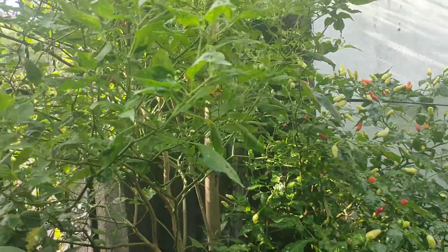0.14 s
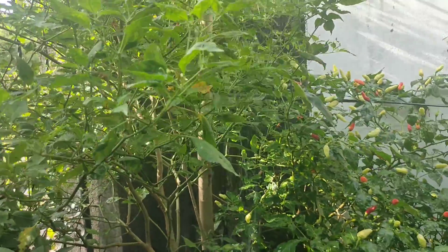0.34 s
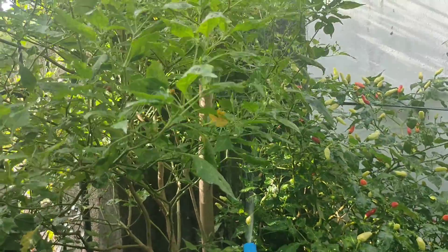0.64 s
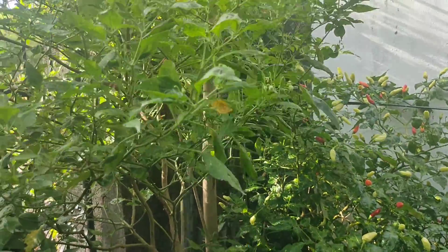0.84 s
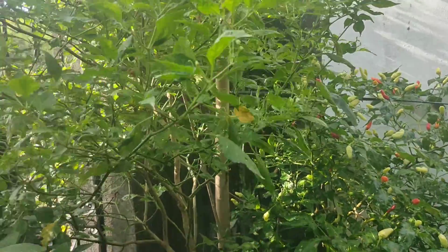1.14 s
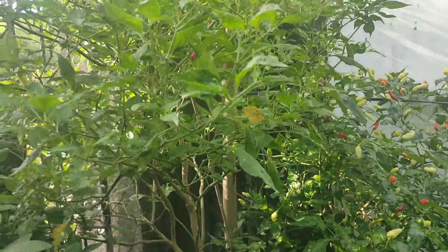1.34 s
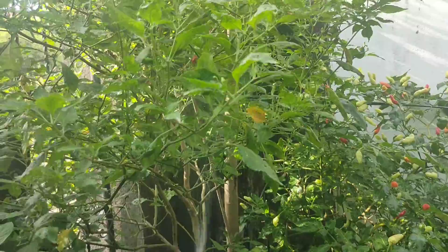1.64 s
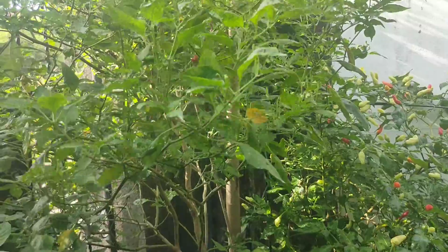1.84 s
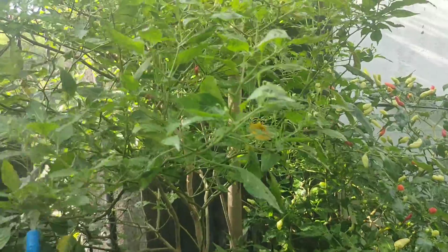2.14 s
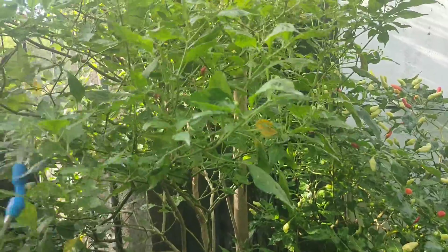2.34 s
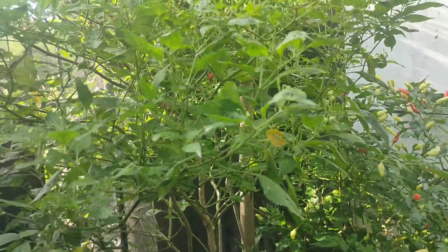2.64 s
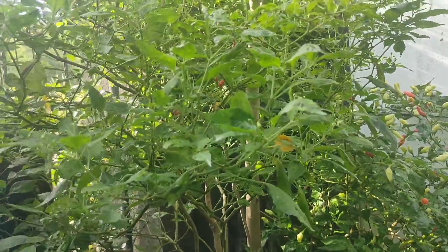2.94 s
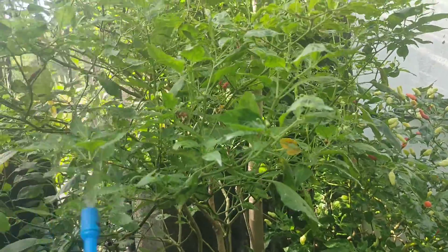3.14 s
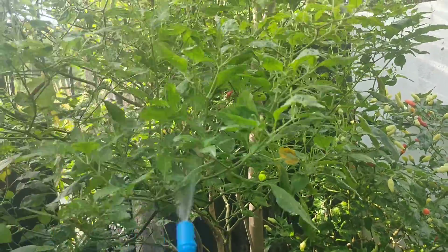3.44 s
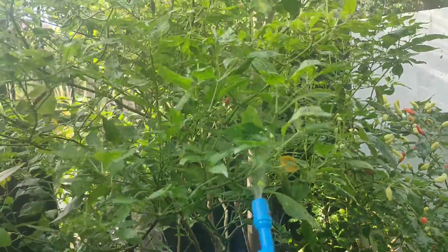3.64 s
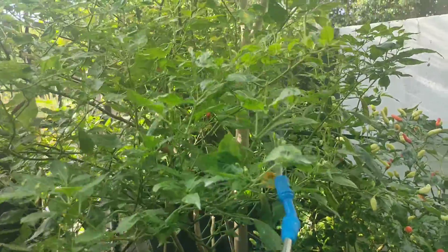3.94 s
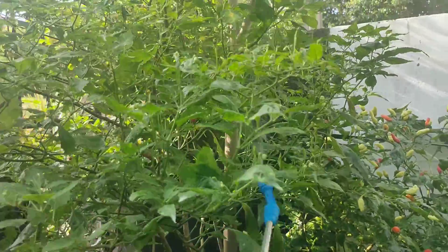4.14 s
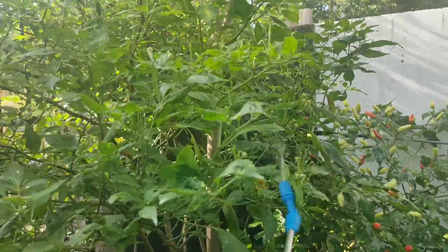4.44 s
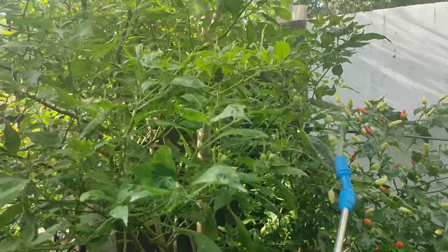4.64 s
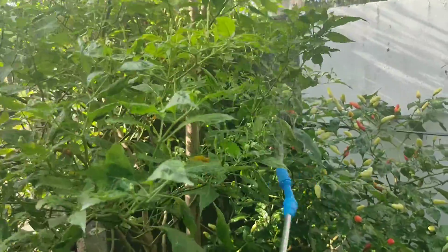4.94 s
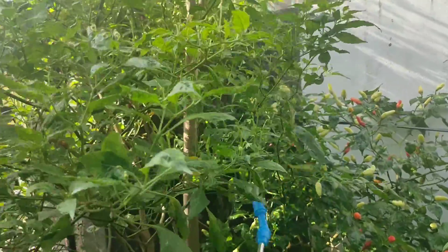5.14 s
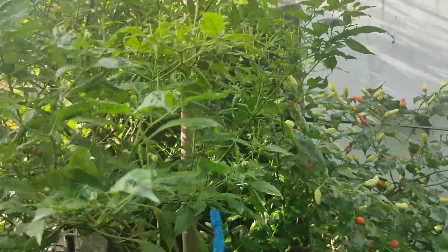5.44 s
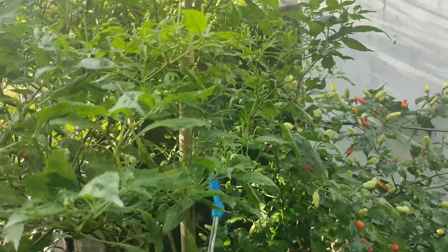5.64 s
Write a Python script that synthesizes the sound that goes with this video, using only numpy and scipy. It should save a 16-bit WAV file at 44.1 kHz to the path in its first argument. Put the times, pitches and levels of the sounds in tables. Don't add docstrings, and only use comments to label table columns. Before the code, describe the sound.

Close, bright spray hiss fizzes and patters unevenly across foliage while the wand and hose rub, ring faintly and bump stems.

```python
import sys
import numpy as np
from scipy import signal
from scipy.fft import rfft, irfft
from scipy.io import wavfile
from scipy.ndimage import uniform_filter1d

SR = 44100
rng = np.random.default_rng(int(sys.argv[2]) if len(sys.argv) > 2 else 0)


def voltage_ratio(decibels):
    exponent = np.asarray(decibels, float) / 20
    return 10 ** exponent


def wav_out(sig):
    wavfile.write(sys.argv[1], SR, np.round(np.clip(np.atleast_2d(sig).T, -1, 1) * 32767).astype(np.int16))


N = 255339
TIME_S = np.arange(N) / SR
FRAME, HOP = 512, 128
HZ = np.fft.rfftfreq(FRAME, 1 / SR)
FRAME_S = np.arange(N // HOP + 5) * HOP / SR


# time_s, fizz_db, broad_leaves_db, left_over_right_db
SWEEP = [(0.0, -39, 4, 4), (0.3, -42.5, 4.5, 2), (0.7, -43.5, 3, 2.5), (1.0, -42, 2.5, 0.5),
         (1.3, -42.5, 0.5, 1.5), (1.68, -45, 2, 2), (1.9, -41, 2.5, 1.5), (2.1, -46, -2.5, 0.5),
         (2.5, -43.5, -3, 0.5), (2.8, -45, -5, 1), (3.1, -43.5, 3, 0.5), (3.45, -41.5, 4, 1.5),
         (3.9, -43, 2.5, 2.5), (4.25, -43.5, -0.5, 2), (4.55, -44, 2, 3), (5.0, -45, 6, 2),
         (5.38, -45, 1, 2), (5.79, -44, 3.5, 0.5)]
# pitch_hz, density_db
JET_SPECTRUM = [(3000, -26.5), (7000, -9), (11000, 1.5), (16000, -2.5)]
# pitch_hz, density_db
FIZZ_SPECTRUM = [(2500, -21.5), (4000, -3), (6000, 2), (8400, 6.5), (9600, 4), (12000, -4), (16000, -15)]
# pitch_hz, density_db
PATTER_SPECTRUM = [(900, -29), (1400, -21), (1800, 3.5), (2400, 1.5), (3200, 1), (4300, -3.5), (5500, -12),
                   (9000, -22.5), (16000, -10.5)]


def spray():
    base_db, broad_db, pan_db = follow(SWEEP)
    fizz_up_db, patter_up_db = swells()
    fizz_db = base_db + fizz_up_db
    slow_db = uniform_filter1d(fizz_db, size=SR // 3)
    jet = voltage_ratio(slow_db - 7.0) * cloud(JET_SPECTRUM, patchy_db=2.0, flicker_db=1.0)
    fizz = voltage_ratio(fizz_db - 3.0) * cloud(FIZZ_SPECTRUM, patchy_db=1.5, flicker_db=0.85)

    mist = cloud(PATTER_SPECTRUM, patchy_db=1.5, flicker_db=1.0)
    taps = drops(per_s=900, spread_db=3.5, low_hz=1580, high_hz=10400, cycles=2.4)
    patter_db = base_db - 2.5 + 0.12 * broad_db + patter_up_db
    patter = voltage_ratio(patter_db) * (mist + voltage_ratio(-10.0) * taps)

    wobble_db = 2.18 * wander(2000)
    drum_db = base_db - 10.5 + broad_db + 0.94 * patter_up_db + wobble_db
    drum = voltage_ratio(drum_db) * band(pair(0.06), 1060.0, 1807.0)

    sputter = voltage_ratio(0.29 * wobble_db)
    sputter = sputter * voltage_ratio(1.31 * wander(40))
    pan = voltage_ratio(np.array([[.5], [-.5]]) * (pan_db - 3.0))
    return drum + sputter * (jet + (fizz + patter) * pan)


# middle_s, length_s, fizz_swell_db, patter_swell_db
LEAVES = [(0.07, 0.18, 3, 0), (0.177, 0.11, 4, -5), (0.372, 0.069, 4, -2.5), (0.464, 0.13, 7.5, 4.5),
          (0.539, 0.093, 6, 6.5), (0.77, 0.091, 4, 2), (0.97, 0.051, 2, -0.5), (1.127, 0.049, 1.5, 3.5),
          (1.456, 0.44, 4, 4), (1.776, 0.21, 4, 4), (1.977, 0.037, 7.5, 4.5), (2.208, 0.25, 7, 5.5),
          (2.42, 0.19, 4, 2.5), (2.503, 0.16, 1, -1.5), (2.69, 0.2, 1, 1.5), (3.035, 0.31, 4, 3.5),
          (3.235, 0.32, 4.5, 1.5), (3.56, 0.19, 1, 0), (3.825, 0.15, 4, 4), (3.9, 0.078, 4.5, 2.5),
          (4.104, 0.12, 3.5, -1), (4.46, 0.54, 4.5, 3), (4.701, 0.14, 6.5, 4), (4.867, 0.091, 7, 4.5),
          (4.933, 0.12, 4, 9), (5.169, 0.025, 4.5, 0), (5.534, 0.15, 5.5, 4.5), (5.618, 0.045, 4, -0.5),
          (5.7, 0.1, 7.5, 6), (5.79, 0.12, 5.5, 1)]


def swells():
    middle_s, length_s, *columns_db = np.transpose(LEAVES)[:, :, None]
    hump = np.cos(np.pi * np.clip((FRAME_S - middle_s) / length_s, -.5, .5)) ** 2
    return [np.interp(TIME_S, FRAME_S, (db * hump).sum(0)) for db in columns_db]


# pitch_hz, likeness
LIKENESS = [(60, 0.79), (160, 1), (300, 1), (600, 0.18), (1200, 0.83), (3000, 0.41), (6000, 0.32),
            (15000, 0.058)]
# time_s, left_lag_samples
LAG = [(0, 1.1), (.6, 1), (1.0, 11.5), (1.45, 2), (1.75, 11), (2.4, 11.5), (2.9, 11.5), (3.4, 1.5),
       (4.1, 1.5), (4.5, -4.5), (5.0, 2.5), (5.79, 2.5)]


def cloud(spectrum, patchy_db, flicker_db):
    a, b, c, d, patches = rng.standard_normal((len(FRAME_S), len(HZ), 5)).T
    patches = uniform_filter1d(patches, size=7, axis=0)
    patches = evened(uniform_filter1d(patches, size=20, axis=1))
    flicker = evened(uniform_filter1d(rng.standard_normal(len(FRAME_S)), size=5))
    same = np.clip(read(LIKENESS, HZ), -1, 1)[:, None]
    lag_s = np.interp(FRAME_S, *np.transpose(LAG)) / SR
    late = np.exp(-2j * np.pi * HZ[:, None] * lag_s)
    right = a + 1j * b
    left = same * late * right + np.sqrt(1 - same ** 2) * (c + 1j * d)
    level_db = read(spectrum, HZ)[:, None] + patchy_db * patches + flicker_db * flicker
    z = np.array([left, right]) * voltage_ratio(level_db)
    return evened(signal.istft(z, nperseg=FRAME, noverlap=FRAME - HOP)[1][:, :N])


def drops(per_s, spread_db, low_hz, high_hz, cycles):
    size = voltage_ratio(spread_db * np.minimum(rng.exponential(1, N), 5)) * (rng.random(N) < per_s / SR)
    leaf = rng.integers(0, 24, N)
    out = np.zeros((2, N))
    t = np.arange(256) / SR
    for k, pitch_hz in enumerate(np.geomspace(low_hz, high_hz, num=24)):
        tap = np.sin(2 * np.pi * pitch_hz * t) * np.exp(-t * pitch_hz / cycles)
        out[k % 2] += signal.oaconvolve(size * (leaf == k), tap / np.linalg.norm(tap))[:N]
    return evened(out + 0.25 * out[::-1])


# start_s, peak_db, length_s
SPLATS = [(0.054, -23, 0.019), (0.063, -22, 0.006), (0.074, -21, 0.008), (0.082, -21, 0.012),
          (0.092, -18.5, 0.015), (0.1, -26, 0.039), (0.172, -25, 0.01), (0.18, -27, 0.011),
          (0.193, -22.5, 0.014), (0.207, -25, .008), (0.348, -28, 0.015), (0.758, -30, .008),
          (0.767, -27, .006), (0.778, -25, .004), (0.788, -30, .005), (0.965, -33, .005),
          (0.976, -32, .006), (1.115, -32, .02), (1.184, -28.5, 0.015), (2.947, -33, .006),
          (2.984, -32, .008), (3.006, -33, .008), (1.539, -26, 0.017), (1.978, -30, 0.017),
          (2.602, -39, .015), (4.695, -33, 0.029), (4.905, -30, 0.05), (4.935, -33, 0.04),
          (5.17, -44, 0.0089), (5.556, -22, 0.0092)]


def splats():
    shape = np.zeros(N)
    for start_s, peak_db, length_s in SPLATS:
        since = np.maximum(TIME_S - start_s, 0) / max(length_s, .002)
        shape += voltage_ratio(peak_db - 15.5) * 3 * since * np.exp(1 - 3 * since)
    crackle = voltage_ratio(4.5 * wander(12))
    return shape * band(pair(0.39) * crackle, 1460.0, 6360.0)


# time_s, pitch_hz, level_db
WHISTLE = [
    [(3.3, 9500, -65), (3.5, 9430, -58), (3.7, 9300, -52.5), (3.85, 9270, -54.5), (3.9, 9180, -44.5),
     (3.97, 9170, -53), (4.1, 9040, -57), (4.17, 8980, -70)],
    [(4.36, 8800, -73), (4.44, 8820, -52), (4.58, 8820, -52), (4.63, 8950, -62), (4.68, 9120, -53),
     (4.74, 9100, -73)],
]


def whistle():
    out = 0
    for spell in WHISTLE:
        pitch_hz, level_db = follow(spell)
        tone = [steadied(resonate(x, pitch_hz, 60.0), 0.6, size=600) for x in pair(0.32)]
        out = out + voltage_ratio(level_db) * (level_db > -71.9) * np.array(tone)
    return out


# time_s, octave_level_db, width_hz
VALVE = [(2.8, -79, 80), (3.12, -50.5, 50), (3.39, -52, 21), (3.5, -45, 12), (3.57, -40, 10),
         (3.66, -63, 49), (4.0, -57, 98), (4.7, -54, 90), (5.79, -53, 120)]


def valve():
    level_db, width_hz = follow(VALVE)
    locked = np.clip((60 - width_hz) / 45, 0, 1)
    pitch_hz = 927 * (1 + 0.0061 * wander(600))
    turn = 2 * np.pi * np.cumsum(pitch_hz) / SR - np.array([[2.9], [0]])
    octave = np.sin(2 * turn + np.array([[2.5], [0]]))
    tone = np.sqrt(2) * (octave + voltage_ratio(-3.5) * np.sin(turn))
    hum = np.array([resonate(x, 1870.0, 150.0) for x in pair(0.65)])
    return voltage_ratio(level_db) * (locked * tone * voltage_ratio([[-4.0], [3.0]]) + (1 - locked) * hum)


# start_s, length_s, low_rub_db, rustle_db
STROKES = [(0.03, 0.092, -78, -52.5), (0.25, 0.091, -72, -50.5), (0.33, 0.071, -64, -47),
           (0.42, 0.18, -87, -56.5), (0.82, 0.096, -85, -64), (0.965, 0.042, -49, -48),
           (1.03, 0.14, -63, -45.5), (1.32, 0.28, -87, -57.5), (1.8, 0.065, -77, -44.5),
           (1.9, 0.16, -59.5, -46), (2.07, 0.069, -58, -57), (2.49, 0.04, -71, -62), (2.6, 0.051, -72, -61),
           (3.02, 0.29, -75, -52.5), (3.33, 0.078, -64, -54), (3.4, 0.043, -84, -50),
           (3.62, 0.14, -58, -47), (3.78, 0.16, -61.5, -44), (3.97, 0.12, -74, -57), (4.12, 0.21, -68, -68),
           (4.55, 0.048, -63, -82), (4.9, .07, -70, -72), (5.085, 0.037, -53, -54.5),
           (5.14, 0.034, -49.5, -53.5), (5.19, .03, -51.5, -61), (5.25, 0.044, -57.5, -69),
           (5.68, .2, -44, -64.5)]


def rub():
    low_gain, rustle_gain = held(STROKES, rise_s=0.031, fall_s=0.033, rest_db=(-73.5, -85))
    slips = voltage_ratio(3.4 * wander(700))
    low = steadied(band(pair(0.61) * slips, 220.0, 385.0), 0.67, size=900) * voltage_ratio([[-1.5], [1.5]])
    rustle = steadied(band(pair(0.064) * slips, 594.0, 1200.0), 0.37, size=900)
    return low_gain * low + rustle_gain * rustle


# start_s, length_s, pitch_hz, width_hz, level_db
RINGS = [(0.0374, 0.096, 640, 80, -52), (0.22, 0.19, 561, 50, -56), (0.812, 0.1, 760, 150, -52.5),
         (1.03, 0.093, 385, 46, -51), (1.05, 0.22, 747, 130, -50), (1.52, 0.065, 650, 100, -55),
         (1.125, 0.06, 330, 50, -52), (1.79, 0.182, 564, 73, -42), (1.809, 0.16, 958, 150, -43.5),
         (1.958, 0.095, 643, 180, -41.5), (1.873, 0.108, 430, 110, -45.5), (2.017, 0.113, 301, 83, -53),
         (3.04, 0.24, 745, 64, -51), (3.041, 0.14, 892, 21, -50.5), (3.637, 0.115, 310, 43, -49.5),
         (3.627, 0.102, 700, 140, -47), (3.661, .074, 930, 39, -47.5), (3.817, 0.109, 477, 170, -47),
         (3.96, 0.118, 693, 53, -48), (4.06, 0.17, 690, 54, -51.5), (4.108, 0.16, 385, 40, -57.5),
         (4.896, 0.089, 770, 76, -55), (2.49, 0.04, 790, 60, -56.5), (2.74, 0.057, 725, 50, -56.5),
         (2.83, .03, 724, 40, -58.5), (2.64, 0.044, 560, 80, -61), (2.73, 0.087, 480, 74, -64),
         (2.07, 0.078, 500, 92, -54.5), (3.02, .4, 1200, 110, -52), (3.5, 0.13, 950, 120, -47),
         (5.09, 0.064, 640, 50, -58), (5.095, .12, 155, 30, -39.5), (5.08, .04, 290, 40, -47.5),
         (5.13, .05, 270, 37, -44), (5.24, .08, 250, 40, -55), (5.68, 0.039, 290, 53, -45),
         (4.92, 0.053, 580, 80, -62), (1.24, .08, 300, 60, -59), (.17, 0.079, 720, 80, -55),
         (3.28, .2, 730, 79, -56), (0.335, .05, 440, 150, -56), (4.282, 0.27, 712, 60, -63),
         (5.525, .08, 690, 52, -63)]


def rings():
    late_s = 0.0003
    out = np.zeros((2, N))
    for start_s, length_s, pitch_hz, width_hz, level_db in RINGS:
        first, last = round(start_s * SR), round((start_s + min(length_s, .45)) * SR)
        t = np.arange(first, last) / SR
        r = np.exp(-np.pi * width_hz / SR)
        a, b = rng.standard_normal((2, SR // 2))[:, :len(t)]
        drift = signal.lfilter([1], [1, -2 * r, r * r], a + 1j * b + 0j)
        drift = evened(drift.view(float)).view(complex)
        drift = drift / (abs(drift) + 0.24) ** 0.23
        lag = 2 * np.pi * pitch_hz * late_s
        turn = 2 * np.pi * pitch_hz * t - np.array([[lag], [0]])
        note = (drift * np.exp(1j * turn)).real
        out[:, first:last] += voltage_ratio(level_db) * note * signal.windows.tukey(len(t), .4)
    return out


# start_s, length_s, shake_db, scrape_db
SHIFTS = [(0.0, 0.024, -60, -59), (0.265, 0.15, -39, -55), (0.34, 0.063, -43, -49), (0.67, .03, -42, -57),
          (.715, 0.034, -41.5, -47), (0.8, .05, -46.5, -56), (0.14, 0.11, -56, -64),
          (0.47, 0.048, -46.5, -50), (0.6, .05, -49, -62), (1.0, 0.19, -57.5, -59.5), (1.6, 0.18, -60, -74),
          (2.05, 0.16, -57, -63), (2.74, 0.081, -59.5, -71), (3.7, .05, -68, -74), (5.09, 0.047, -53, -44),
          (5.16, 0.05, -50, -42), (5.23, 0.14, -60, -54), (5.68, .2, -53, -48.5)]


def grip():
    shake_gain, scrape_gain = held(SHIFTS, rise_s=0.035, fall_s=0.037, rest_db=(-70, -74.5))
    rock_hz = 66 * (1 + 0.05 * wander(1500))
    turn = 2 * np.pi * np.cumsum(rock_hz) / SR
    rock = np.sqrt(2) * (np.sin(turn) + voltage_ratio(-6.5) * np.sin(2 * turn + 1))
    shake = rock + voltage_ratio(-9.5) * np.array([resonate(x, 45.0, 70.0) for x in pair(0.83)])
    scrape = steadied(band(pair(0.95), 95.0, 172.5), 0.5, size=900)
    return shake_gain * shake + scrape_gain * scrape


# start_s, peak_db, pitch_hz
KNOCKS = [
    (0.971, -24.5, 424),
    (2.132, -35, 116),
    (3.359, -42, 343),
    (5.36, -52, 117),
]


def knocks():
    out = np.zeros(N)
    for start_s, peak_db, pitch_hz in KNOCKS:
        since_s = np.maximum(TIME_S - start_s - .003, 0)
        turns = since_s * pitch_hz
        out += voltage_ratio(peak_db - 5.0) * turns * np.exp(1 - turns) * np.sin(2 * np.pi * turns)
    return out * voltage_ratio([[-.3], [.3]])


# pitch_hz, density_db
YARD_SPECTRUM = [(15, -39), (25, -6), (74, -7), (119, 21), (178, -8), (395, -19), (451, -12), (755, -8.5),
                 (850, -35), (1100, -58), (1870, -120)]


def yard():
    rumble = voltage_ratio(-61.5) * cloud(YARD_SPECTRUM, patchy_db=4.5, flicker_db=2.5)
    drone = voltage_ratio(-64.0) * np.array([resonate(x, 115.2, 16.0) for x in pair(0.99)])
    depth = voltage_ratio(-66.0) * band(pair(0.98), 20.0, 50.0)
    return rumble + drone + depth


def evened(x):
    return x / np.sqrt(np.mean(x ** 2) + 1e-20)


def wander(size):
    return evened(uniform_filter1d(rng.standard_normal(N), size=size))


def read(points, hz):
    f, value = np.transpose(points)
    return np.interp(np.log(hz + 1), np.log(f + 1), value)


def follow(rows):
    time_s, *columns = np.transpose(rows)
    return [np.interp(TIME_S, time_s, column) for column in columns]


def held(rows, rise_s, fall_s, rest_db):
    start_s, length_s, *columns_db = np.transpose(rows)[:, :, None]
    since_s = FRAME_S - start_s
    rise = np.clip(since_s / rise_s + .5, 0, 1)
    shape = rise * np.exp(-np.maximum(since_s - length_s, 0) / fall_s)
    gains = []
    for db, rest in zip(columns_db, rest_db):
        power = (voltage_ratio(db) ** 2 * shape ** 2).sum(0) + voltage_ratio(rest) ** 2
        gains.append(np.interp(TIME_S, FRAME_S, np.sqrt(power)))
    return gains


def pair(likeness):
    a, b = rng.standard_normal((2, N))
    return np.array([a, likeness * a + np.sqrt(1 - likeness ** 2) * b])


def band(x, low_hz, high_hz):
    sos = signal.butter(N=3, Wn=[low_hz, high_hz], btype="band", fs=SR, output="sos")
    return evened(signal.sosfilt(sos, x))


def resonate(x, pitch_hz, width_hz):
    turn = np.exp(2j * np.pi * np.cumsum(pitch_hz * np.ones(N)) / SR)
    r = np.exp(-np.pi * width_hz / SR)
    once = signal.lfilter([1 - r], [1, -r], x / turn + 1e-18)
    twice = signal.lfilter([1 - r], [1, -r], once)
    return evened((turn * twice).real)


def steadied(x, share, size):
    power = uniform_filter1d(x ** 2, size=size, axis=-1) + 1e-6
    return evened(x / power ** (share / 2))


def scene():
    return spray() + splats() + whistle() + valve() + rub() + rings() + grip() + knocks() + yard()


# pitch_hz, share_of_time_shut
GAPS = [(600, 0), (900, .02), (1500, .04), (2200, .08), (4200, .13), (4600, .34), (5150, .4), (5600, .07),
        (9000, .08), (9500, .35), (11800, .36), (12800, .09), (15000, .1), (15700, .2)]


def gapped(x):
    hz, _, z = signal.stft(x, SR, nperseg=2048, noverlap=1536)
    bin_power = (abs(z) ** 2).sum(0)
    power = uniform_filter1d(uniform_filter1d(bin_power, size=7, axis=0), size=3, axis=1)
    level_db = 10 * np.log10(power + 1e-20)
    blocks = np.kron(rng.standard_normal((len(hz) // 8 + 1, z.shape[2] // 3 + 2)), np.ones((8, 3)))
    whim = evened(uniform_filter1d(blocks, size=3, axis=1))[:len(hz), :z.shape[2]]
    standing = whim + .25 * (level_db - uniform_filter1d(level_db, size=61, axis=0))
    rank = standing.argsort(axis=1).argsort(axis=1) / z.shape[2]
    share = read(GAPS, hz)[:, None]
    shut = (rank < share) | (bin_power < 2.0 * share * power)
    z = z * voltage_ratio(-45.0 * shut) / (1 - share) ** .4
    return signal.istft(z, SR, nperseg=2048, noverlap=1536)[1][:, :N]


def roll_off(x):
    return signal.sosfilt(signal.butter(12, 15800, fs=SR, output="sos"), x)


# pitch_hz, gain_db
PORTS = [
    [(100, -11.5), (1000, -6), (4000, 4.5), (5100, 1.5), (5800, 8.5), (6500, 12.5), (7200, 6.5),
     (8200, -1.5), (9700, 1), (11200, -2.5), (12500, 5.5), (13700, 11), (14700, 7), (15700, -4)],
    [(100, -12), (1000, -6), (4000, 0.5), (5100, -0.5), (6000, -1), (7000, 4.5), (8000, 8.5), (8800, 3),
     (9400, 0.5), (10200, 0), (12000, -0.5), (13900, -14), (15000, 7), (15700, -13)],
]


def record(dry):
    hz = np.fft.rfftfreq(N, 1 / SR)
    port_gain = voltage_ratio(np.array([read(port, hz) for port in PORTS]))
    heard = irfft(rfft(dry, axis=1) * port_gain, N, axis=1)
    return roll_off(gapped(heard))


dry = scene()
out = record(dry)
wav_out(out)
```